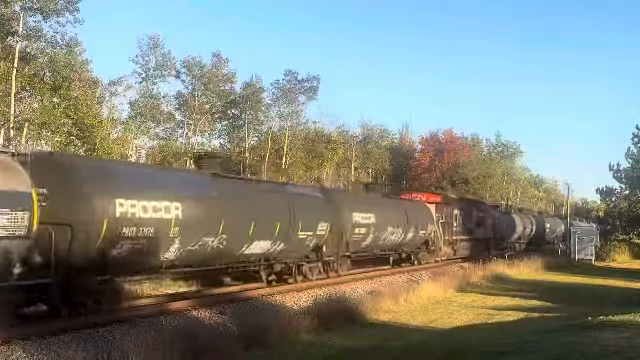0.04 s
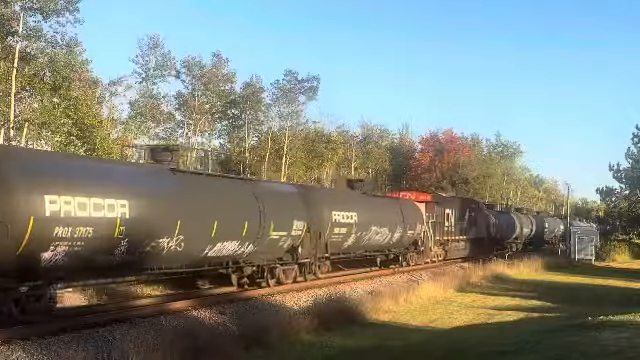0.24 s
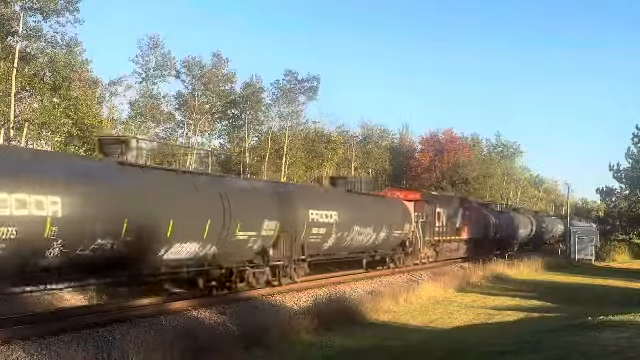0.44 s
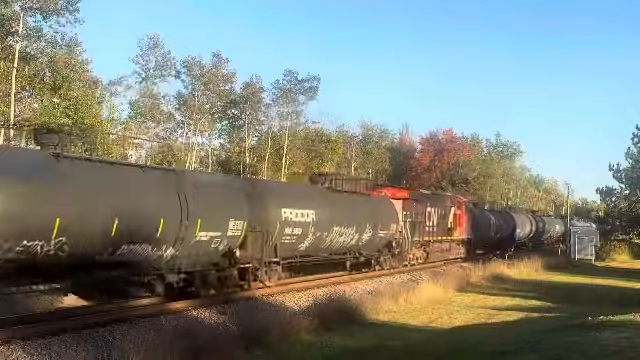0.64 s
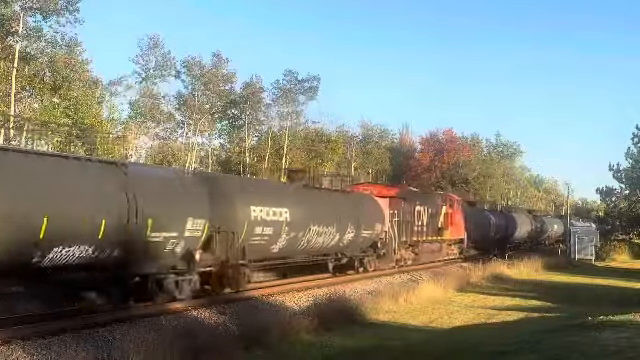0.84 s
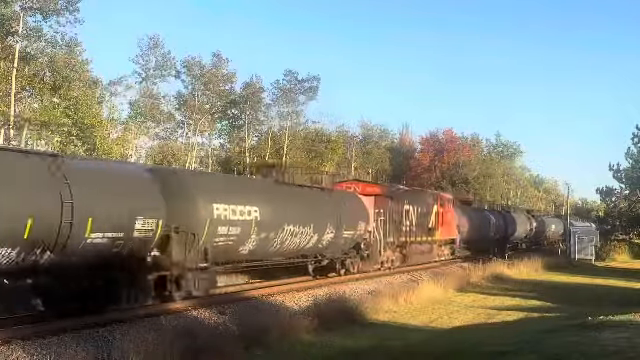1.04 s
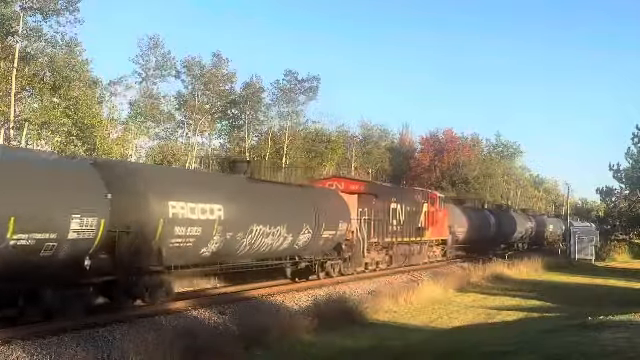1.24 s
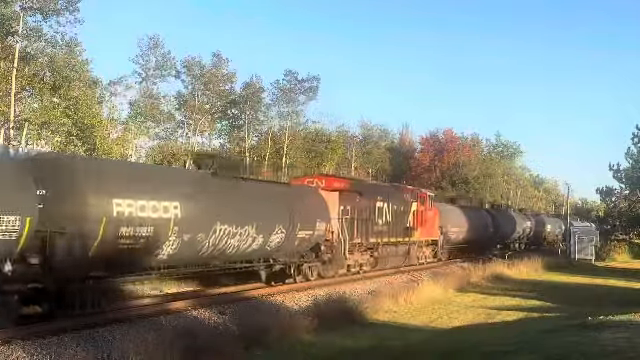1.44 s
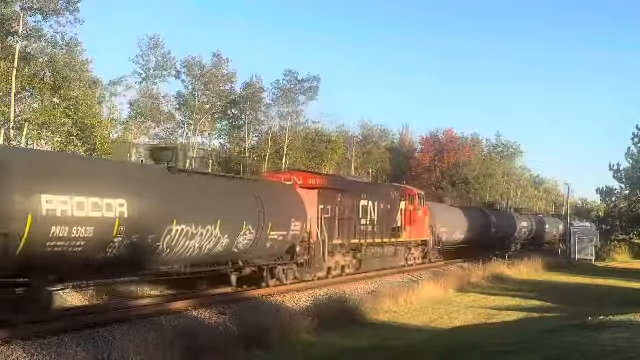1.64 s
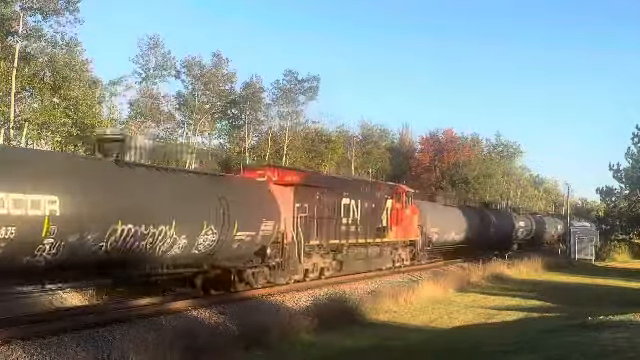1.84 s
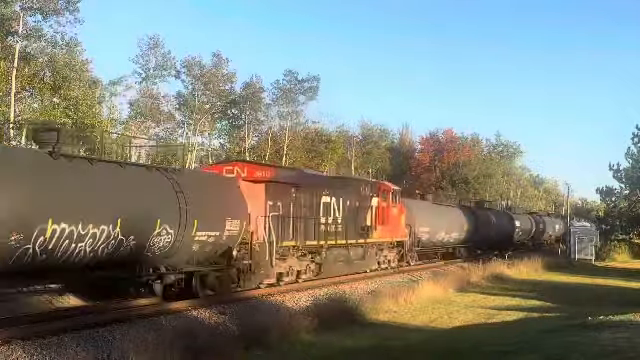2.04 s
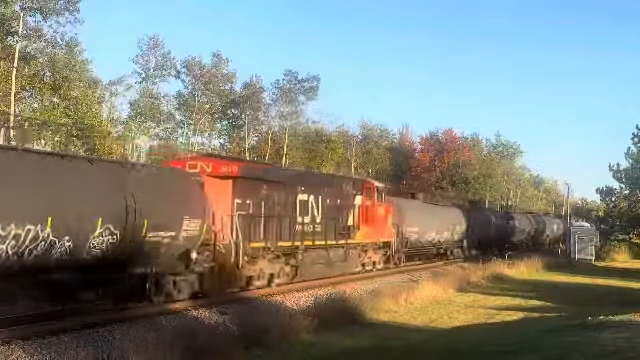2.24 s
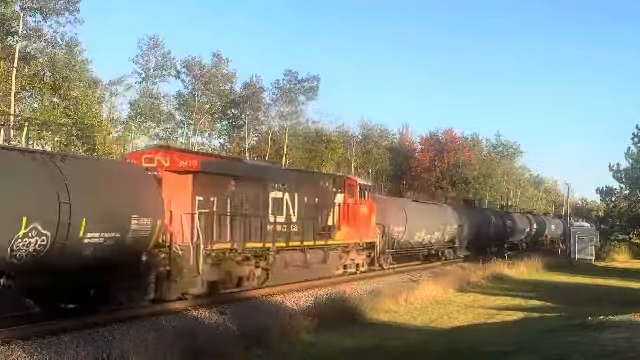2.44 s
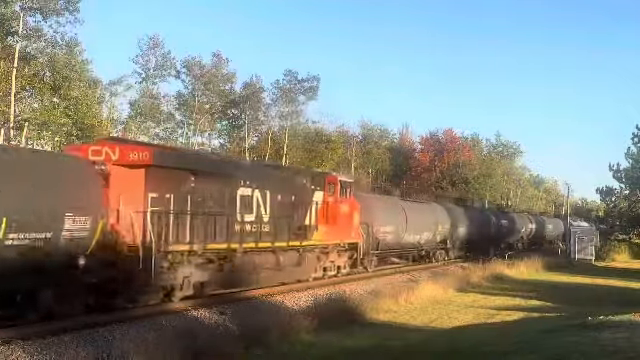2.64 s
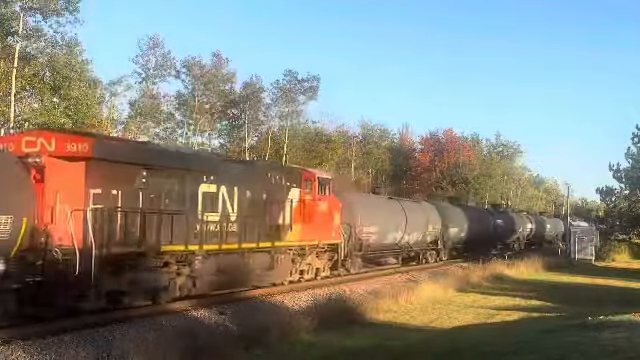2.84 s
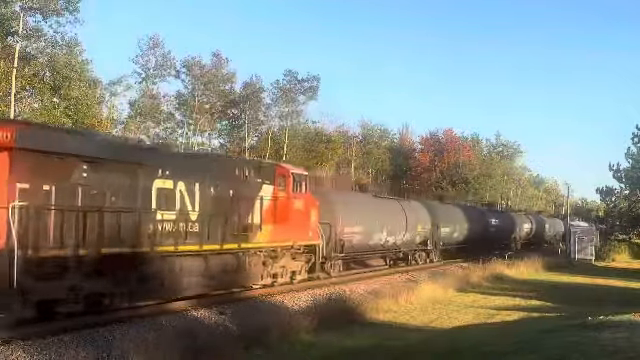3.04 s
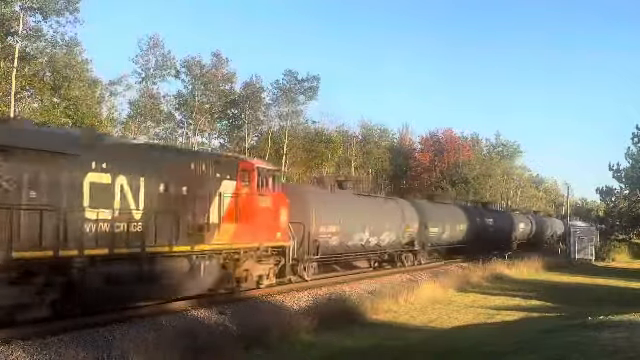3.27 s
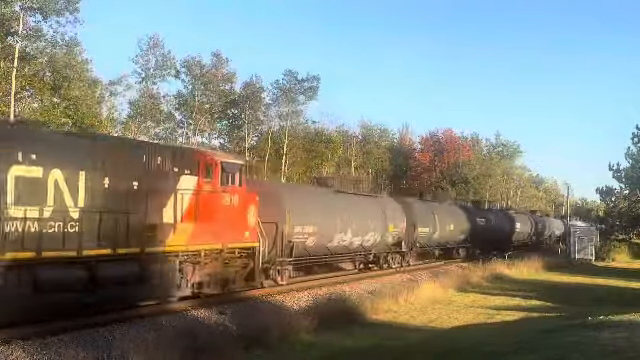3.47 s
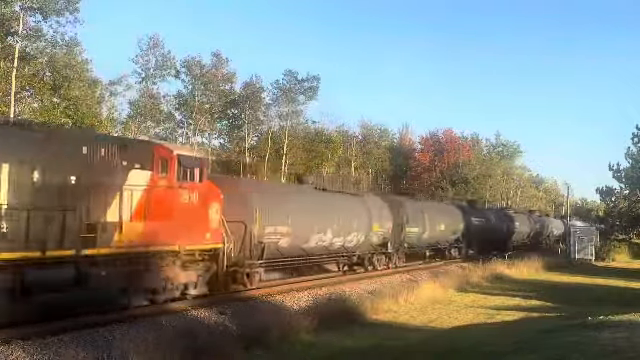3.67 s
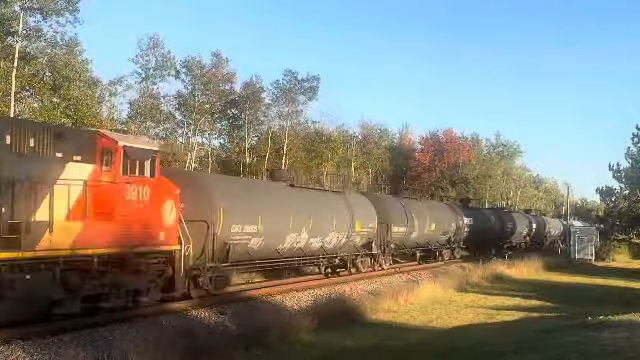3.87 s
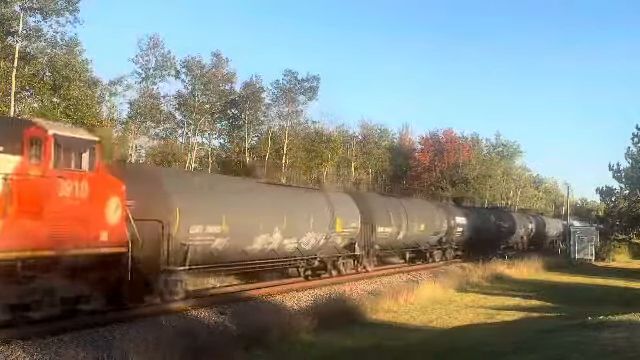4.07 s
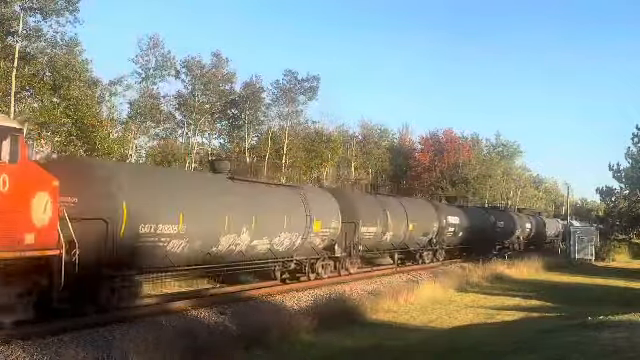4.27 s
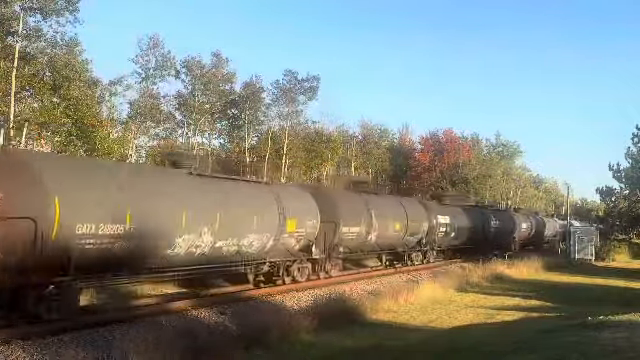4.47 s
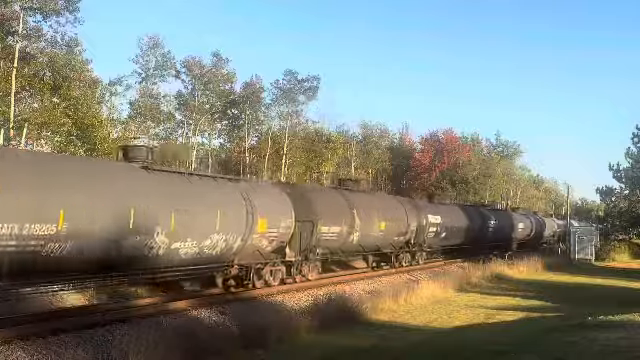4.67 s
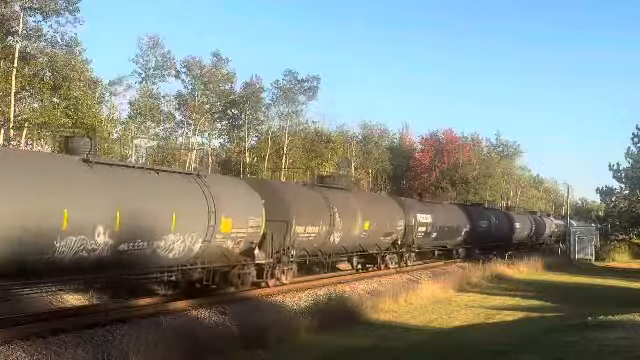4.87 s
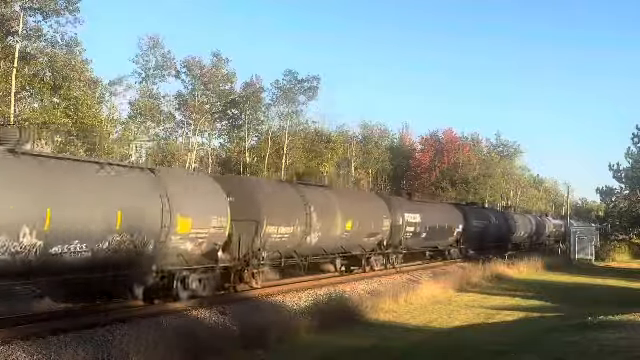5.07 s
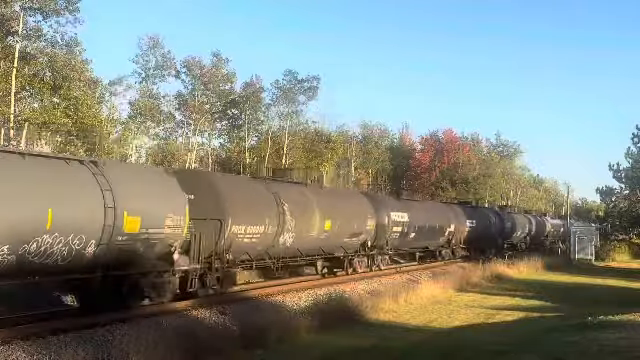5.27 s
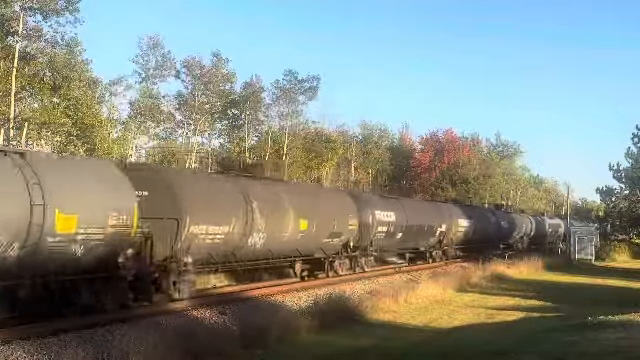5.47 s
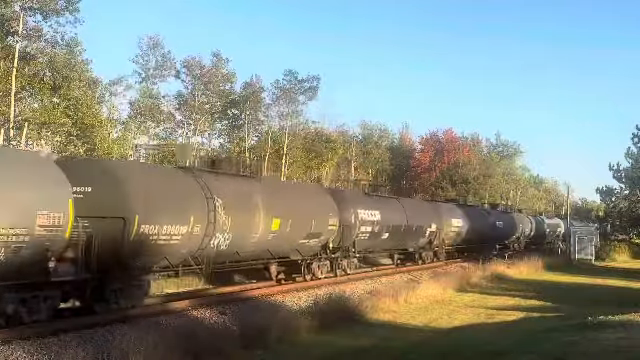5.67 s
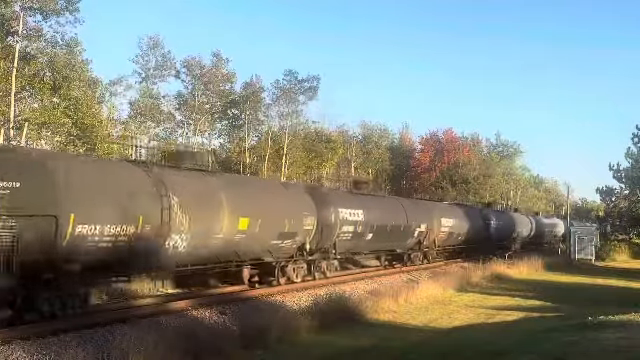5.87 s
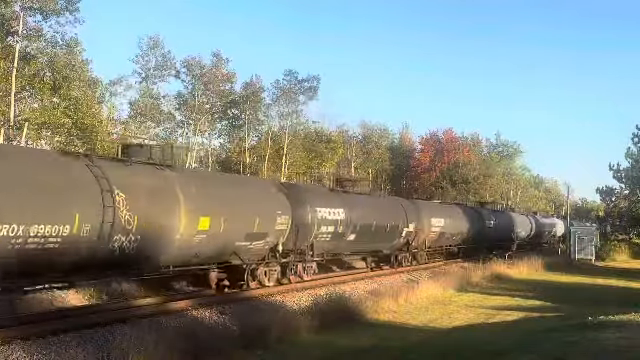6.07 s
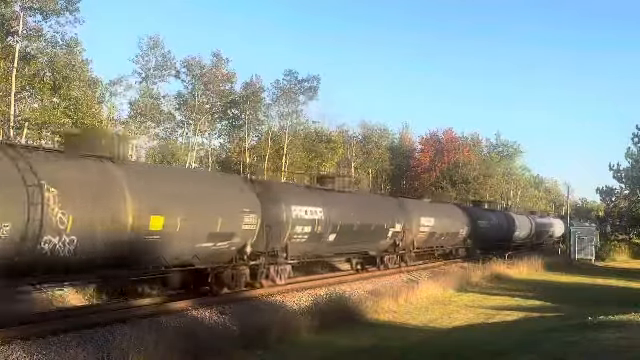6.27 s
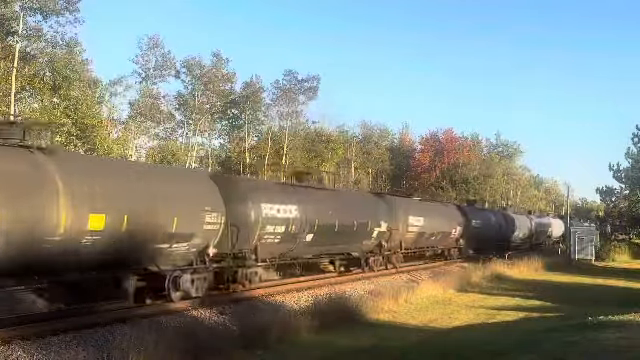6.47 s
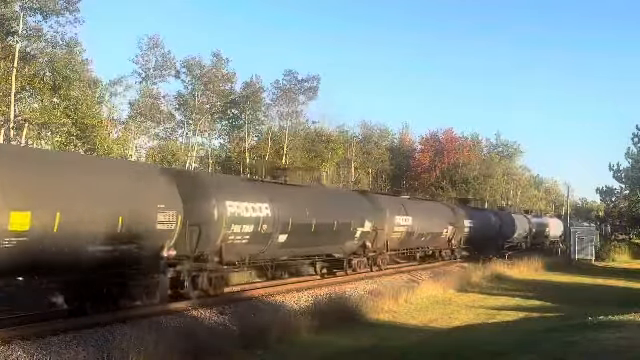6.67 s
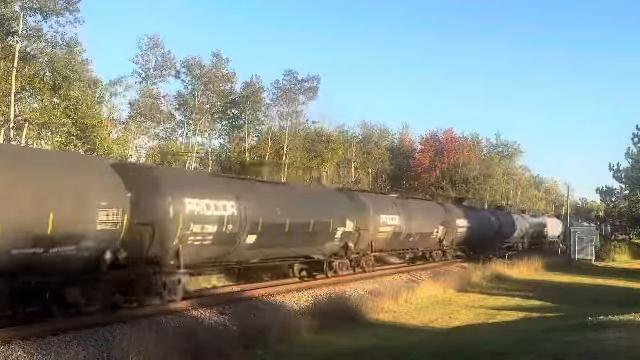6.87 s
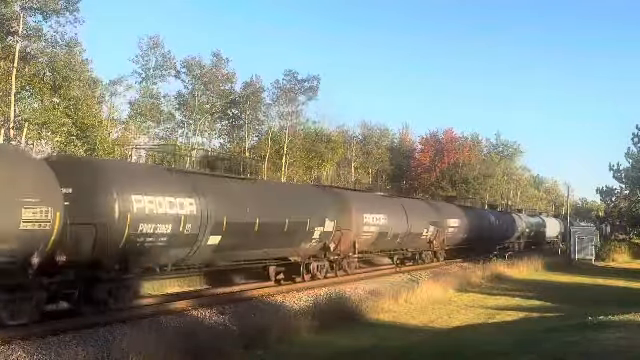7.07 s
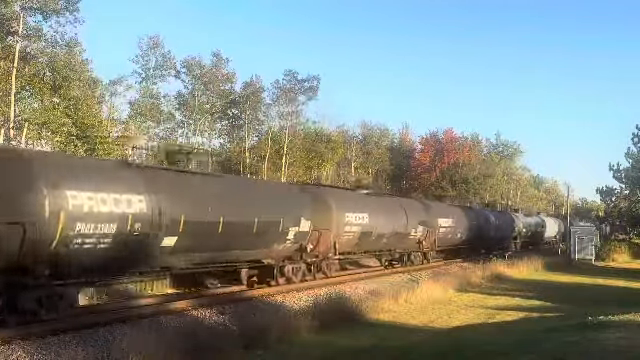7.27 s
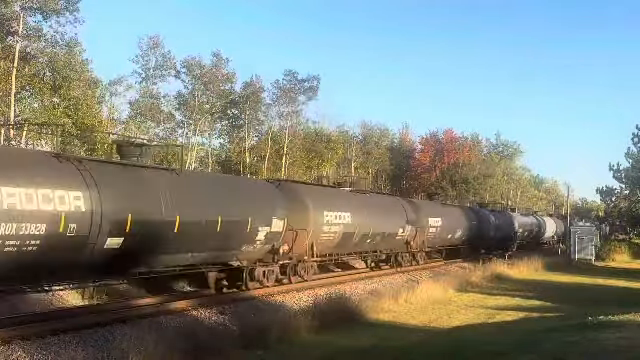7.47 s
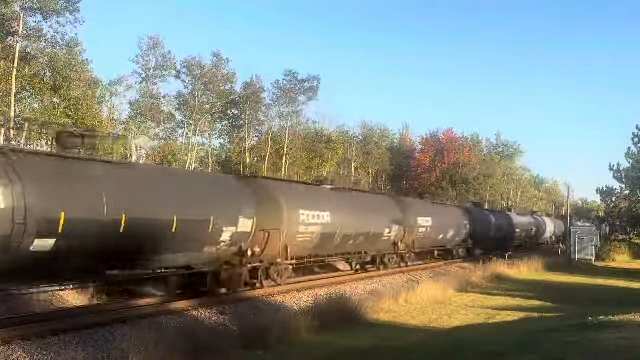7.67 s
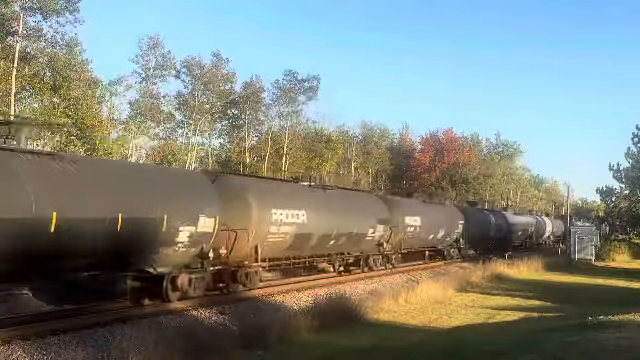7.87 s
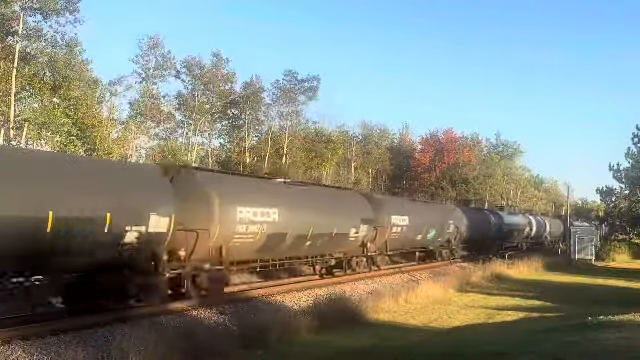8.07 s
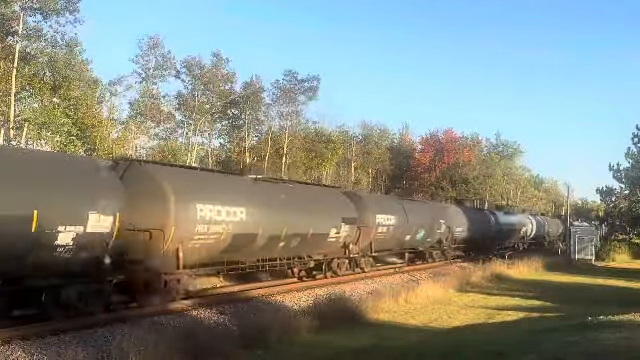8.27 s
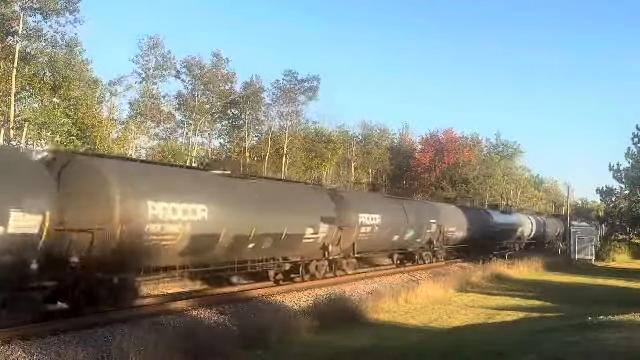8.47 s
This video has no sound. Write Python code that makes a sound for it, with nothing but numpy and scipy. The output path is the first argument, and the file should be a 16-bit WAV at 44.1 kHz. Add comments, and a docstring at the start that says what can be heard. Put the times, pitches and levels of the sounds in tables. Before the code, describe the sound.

Trackside pass of heavy tank cars: regular hard knocks and hissing wheels, a locomotive's throb, whistle and air rush sinking in pitch, then softer rolling.

```python
"""Tank cars of a freight train roll past a trackside listener, a diesel locomotive in mid-train.
Wheel roar and hiss are shaped noise; flat spots and loose bogie parts knock as impulses through a body.
The exhaust throb, turbocharger whistle and gear whine are running-phase tones; all sink in pitch
as the locomotive goes by, and swell in lobes. Its cooling air hisses loudest abreast."""
import sys
import numpy as np
from scipy import signal
from scipy.fft import rfft, irfft, next_fast_len
from scipy.io import wavfile
from scipy.ndimage import uniform_filter1d, map_coordinates

SR = 44100
rng = np.random.default_rng(int(sys.argv[2]) if len(sys.argv) > 2 else 0)


def inscribe(sig):
    """Save sig as 16-bit PCM at rate SR to the path in sys.argv[1].

    A 1-D sig is mono; a 2-D sig holds one channel per row.
    Samples are clipped to [-1, 1] before scaling.
    """
    pcm = np.round(np.clip(np.atleast_2d(sig).T, -1, 1) * 32767)
    wavfile.write(sys.argv[1], SR, pcm.astype(np.int16))


N = 375732
TIME = np.arange(N) / SR
SIDES = np.array([[1], [-1]])  # left, right

# Rolling-noise spectra. Each row: frequency in Hz, relative density in dB per Hz.
RUMBLE_SPECTRUM = [(22, -34), (36, -31), (50, 1.5), (90, 3.5), (150, 0.5), (220, -5.5), (290, -11.5),
                   (600, -56)]
DRUMMING_SPECTRUM = [(150, -25), (250, -0.5), (320, -0.5), (420, -1), (520, -10), (900, -58)]
ROAR_SPECTRUM = [(280, -8.5), (345, -7), (420, -6), (520, -0.5), (700, -2.5), (950, -7), (1300, -13.5),
                 (1700, -16), (2400, -20.5), (5000, -50)]
HISS_SPECTRUM = [(700, -2.5), (1800, -1.5), (2600, 1.1), (3600, 2.5), (5100, 1.5), (5800, 1.5), (7300, 1.5),
                 (8200, -8), (9200, -5), (10200, -14), (11700, -27), (15700, -39.5)]
SIZZLE_SPECTRUM = [(5000, -44), (8200, 2.5), (10500, 0.5), (12000, -9), (15700, -15)]
# Cooling-air spectrum. Each row: frequency in Hz, relative density in dB per Hz.
FANS_SPECTRUM = [(2500, -18), (4800, -1), (6000, -1.5), (7000, 4.5), (8200, 6.5), (9000, 1), (10200, -5.5),
                 (11700, -15.5), (15700, -17)]
# Spectra of bogie thud, rail clank, fittings' ring, rail knock and loose bogie parts.
# Each row: frequency in Hz, relative density in dB per Hz.
THUD_SPECTRUM = [(40, -16), (90, -3), (170, 0.5), (280, -9.5), (600, -18.5), (1500, -65)]
CLANK_SPECTRUM = [(150, -12), (400, -2), (700, 0), (1050, -1.5), (1500, -10.5), (2400, -13.5),
                  (4000, -23.5), (8000, -45)]
RING_SPECTRUM = [(1200, -12), (2800, 0), (5000, -1), (7500, 0), (10000, -12), (15000, -25)]
RAIL_KNOCK_SPECTRUM = [(150, -26), (550, -14), (720, -7), (900, 0), (1030, -1), (1300, -20), (2200, -28),
                       (4000, -42), (9000, -66)]
BOGIE_KNOCK_SPECTRUM = [(100, -22), (240, -4), (360, 0), (700, 0), (1100, -11), (2000, -24), (5000, -45)]

# Likeness of the two channels of a noise. Each row: frequency in Hz, correlation.
CHANNEL_LIKENESS = [(50, 1), (200, 1), (330, 0.93), (500, 0.89), (1100, 0.45), (1500, 0.93), (2000, 1),
                    (2400, 1), (13000, 1), (15000, 0.36)]
# Phase between the channels. Each row: frequency in Hz, phase in half turns.
CHANNEL_PHASE = [(6500, 0), (7300, .46), (7700, .66), (8000, 1), (8700, 1), (9000, .6), (9600, .34),
                 (10300, 0)]
# Side balance, scaled in bearing(). Each row: frequency in Hz, left minus right in dB.
SIDE_BALANCE = [(50, 1.1), (300, 1.3), (500, 2.7), (850, 4), (1200, 3), (1800, 0)]
# Side phase, scaled in bearing(). Each row: frequency in Hz, lead of the left in half turns.
SIDE_LEAD = [(60, .02), (200, .12), (500, .18), (800, .23), (1200, .12), (1500, 0)]
TOP_HZ = 15720
MACH = .042  # train speed over sound speed

# Rolling level of the cars, louder ahead of the locomotive. Each row: time in seconds, level in dB.
CAR_LEVELS = [(0, -.5), (1.1, 1.3), (2.1, 2.5), (4.6, -3.5), (5.7, -7), (7.7, -8), (8.52, -9.5)]
# Car share of each layer, before the layer gains in rolling().
CAR_RUMBLE_DB, CAR_DRUMMING_DB, CAR_ROAR_DB, CAR_HISS_DB = -28, -36, -26.6, -29.5
RUMBLE_FOLLOWS, DRUMMING_FOLLOWS = 0.26, 0.5  # dB per dB of CAR_LEVELS
# The locomotive's two bogies, before the layer gains and spreads in rolling(). Each row: time abreast
# in seconds, seconds to fall 6 dB, drumming in dB, roar in dB, hiss in dB.
LOCO_BOGIES = [(2.85, 0.57, -20, -21, -23.5), (3.9, 0.56, -18.5, -22.5, -25)]
DRUMMING_SPREAD, ROAR_SPREAD = 1.65, 1.52  # fall time, times that of the hiss
# Ground rumble under each end of the locomotive, before the rumble gain.
# Each row: time in seconds, seconds to fall 6 dB, level in dB.
HEAVY_ENDS = [(3, 1.7, -25), (4.5, .9, -27.5)]

# Modes of the rolling wheels. Each row: frequency in Hz, width in Hz (half of it is held to 15-45 Hz),
# relative level in dB.
WHEEL_MODES = [(1957, 46, 5), (2445, 44, 3), (3230, 120, -10), (3900, 33, 1), (4590, 58, -2),
               (5600, 350, -1.5)]
WHEELS_DB = -48.5

# Exhaust lobes sweeping past. Each row: multiple of the base rate, peak level in dB,
# time of the peak in seconds, seconds to fall 3 dB.
EXHAUST_LOBES = [(2, -22, .3, .7), (2, -19.8, 1.65, .45), (2, -22.5, 3.1, .8), (2, -20.8, 5, .7),
                 (2, -29.5, 7, 1.3), (3, -23.5, 3, 1.9), (3, -21, 4.45, .45), (3, -21, 6.4, .55),
                 (3, -25, 7.8, .9), (4, -20, 2.35, .45), (4, -20.3, 4.3, 1.15), (4, -31.5, 4.5, 5),
                 (5, -25.5, 1.05, .2), (5, -29, 1.6, 1.3), (5, -18.5, 3.45, .26), (5, -23.5, 4.65, .22),
                 (5, -21.3, 6.2, .55), (5, -24, 7.4, .4), (5, -24, 8.45, .15), (6, -29, 3, .7),
                 (7, -27.5, 3.9, .55), (7, -29.5, 5, .25), (10.5, -27, 3.96, .35), (10.5, -35, 1.4, .8),
                 (10.5, -34, 4.9, .25), (16, -34, 1.1, 1.6), (16, -29.5, 3.9, .45)]
EXHAUST_HZ = 26.23  # base rate before Doppler

# Turbocharger whistle lobes, before TURBO_GAIN_DB. Each row: time in seconds, seconds to fall 6 dB,
# level in dB.
TURBO_LOBES = [(.27, .1, -35.5), (1.56, .22, -34.5), (2.06, .09, -33.5), (2.25, .06, -37), (2.55, .07, -32),
               (2.74, .08, -29.5), (3.02, .1, -35), (3.3, .15, -32.5), (3.72, .12, -32), (4.25, .2, -35),
               (4.78, .25, -39), (5.35, .2, -44), (5.75, .1, -44.5), (6.4, .2, -53)]
# Whistle smeared into narrow hiss. Each row: time in seconds, seconds to fall 6 dB, level in dB.
TURBO_SMEAR = [(3.15, .3, -39), (4.25, .22, -39), (4.85, .3, -42)]
SMEAR_HZ, TURBO_HZ = 70, 3969  # hiss width; whistle before Doppler
# Steady whistle between lobes, its change once past, and the gain on whistle and lobes.
TURBO_DB, TURBO_BEHIND_DB, TURBO_GAIN_DB = -47, -27, 1

# Wheel flats. Each row: knock time in seconds, knock in dB, seconds until the wheel lands,
# thud in dB, clank in dB (both before the gains in wheel_flats()), top of the clank in Hz.
FLATS = [(.084, -5.5, .014, -9, -16.5, 4500), (.269, -10.5, .009, -6.5, -14.5, 5500),
         (.451, -9, .006, -9, -14.5, 6000), (.641, -13, .004, -7, -15.5, 7000),
         (.828, -12, .004, -7.5, -16.5, 3000), (1.013, -17, .003, -9, -20, 3000),
         (1.198, -17, .003, -11, -19, 4000), (1.383, -15, .005, -9, -19, 3000),
         (1.574, -20, .004, -14, -24, 2000), (1.766, -21, .003, -8, -25, 2000),
         (1.955, -21, .004, -10, -24, 2000), (2.175, -18, .003, -7, -23, 2000),
         (5.919, -24, .006, -22, -27, 1300), (6.115, -22, .008, -20, -26, 1800),
         (6.306, -25, .006, -24, -29, 1300), (6.508, -23, .006, -19, -27, 1300),
         (6.93, -26, .005, -20, -32, 1500), (7.138, -24, .004, -25, -31, 1500),
         (7.327, -25, .004, -19, -27.5, 1600), (7.881, -19, .002, -15, -22.5, 4200),
         (8.069, -17, .002, -12, -25, 2300), (8.257, -17, .003, -12, -27, 1600),
         (8.447, -23, .003, -9, -26.5, 800)]
# Clinks of loose steel fittings. Each row: time in seconds, level in dB.
CLINKS = [(.098, -29), (.28, -30.5), (.457, -27), (.639, -24), (1.2, -33), (7.885, -42)]
SHUDDER_DB = -8  # against the tabled thud
CLANK_T60_S, CLANK_TAIL_DB, CLANK_TAIL_T60_S = .085, -16, .3
RATTLE_DB, RATTLE_PER_S = 2.5, 260  # depth, knots a second

# Hard knocks with the bogie-knock body; some give weight to or follow wheel-flat blows (0.477, 6.52, 7.33,
# 7.884 s). # Each row: time in seconds, level in dB.
HARD_KNOCKS = [(.477, -6), (1.29, -10), (2.323, -7), (6.13, -15), (6.245, -17), (6.52, -16), (6.79, -18),
               (6.96, -18), (7.33, -20), (7.37, -19), (7.71, -20), (7.884, -13)]
BOGIE_KNOCK_DB = -15  # on top of CAR_LEVELS

# Geared axles. Each row: tooth rate in Hz before Doppler, time of closest approach in seconds.
AXLES = [(389.5, 4.55), (397.3, 5.45), (394, 4.6)]
# Gear-whine lobes, before WHINE_GAIN_DB. Each row: axle index, multiple of the tooth rate,
# time in seconds, seconds to fall 6 dB, level in dB.
WHINE_LOBES = [(0, 2, 2.38, .2, -30), (0, 2, 3.05, .35, -29), (0, 2, 3.68, .18, -25.5),
               (0, 3, 1.6, .8, -40), (0, 3, 2.87, .09, -28), (0, 3, 3.22, .14, -30.5),
               (0, 3, 3.85, .28, -33.5), (0, 5, 2.9, .8, -40), (1, 2, 4.58, .12, -29),
               (1, 2, 4.92, .13, -30), (1, 2, 5.45, .35, -38.5), (1, 3, 3.3, .9, -38.5),
               (1, 3, 4.28, .08, -34), (1, 3, 5.1, .4, -37.8), (1, 3, 6.22, .15, -42),
               (1, 3, 6.85, .25, -46), (2, 2, 5.12, .2, -35), (2, 3, 5.1, .2, -42), (2, 3, 5.88, .13, -42)]
# Whine between lobes, gain on whine and lobes, unsteadiness of the tooth rate.
WHINE_DB, WHINE_GAIN_DB, WHINE_WANDER_HZ = -55.5, 1, 1.975

# Singing bands of the rolling noise. Each row: time in seconds, frequency in Hz, width in Hz,
# level in dB, seconds to fall 6 dB, glide at that time in Hz per second.
SINGING_BANDS = [(3.5, 204.5, 70, -26.3, .9, 0), (4.05, 288, 109, -23.8, .75, 0),
                 (3.93, 6090, 650, -26.3, .32, 0), (3.6, 7320, 500, -39, 1.15, -400),
                 (4.42, 7130, 600, -33.5, .43, -800), (5, 6590, 600, -36.5, .43, -650),
                 (5.2, 10150, 600, -50, .35, 0), (5.2, 14450, 1000, -54, .35, 0),
                 (6.6, 9800, 500, -57, .5, 600), (7.1, 500, 170, -36, 3, 0), (7.3, 2003, 50, -55, .7, 0),
                 (6.8, 1205, 18, -52, .5, 0), (8.1, 3270, 90, -56, .4, 0), (5.1, 2400, 40, -46, .12, 0)]


def amp(db):
    """Decibels to gain."""
    return 10 ** (np.asarray(db) / 20)


def unit(x):
    """Scale to rms 1."""
    return x / np.sqrt(np.mean(x ** 2) + 1e-20)


def along(points, hz):
    """Read (Hz, value) points on a log frequency axis."""
    f, v = np.transpose(points)
    return np.interp(np.log(hz + 1), np.log(f + 1), v)


def wobble(rate):
    """Smooth random curve, rate knots a second."""
    coarse = TIME[::32]
    knots = rng.standard_normal(int(N * rate / SR) + 4)
    return np.interp(TIME, coarse, map_coordinates(knots, [coarse * rate]))


def cycles(hz):
    """Running phase in radians of a changing frequency."""
    return 2 * np.pi * np.cumsum(hz) / SR


def filtered(x, response):
    """x through a response given as a function of Hz."""
    m = next_fast_len(N + 8192)
    return irfft(rfft(x, m) * response(np.fft.rfftfreq(m, 1 / SR)), m)[..., :N]


def rush(spectrum, patchy_db):
    """Stereo noise of rms 1, in which narrow resonances come and go."""
    z = signal.stft(rng.standard_normal((2, N)), nperseg=1024)[2]
    field = uniform_filter1d(rng.standard_normal(z.shape[1:]), size=3, axis=0)  # across frequency
    field = uniform_filter1d(field, size=30, axis=1)  # across time
    pair = signal.istft(z * amp(patchy_db * unit(field)), nperseg=1024)[1][:, :N]

    def mid_side(hz):
        turn = np.arccos(np.clip(along(CHANNEL_LIKENESS, hz), -1, 1)) / 2
        return amp(along(spectrum, hz)) * [np.cos(turn), np.sin(turn)]

    mid, side = filtered(pair, mid_side)
    return unit(np.array([mid + side, mid - side]))


def narrow(phase, width_hz):
    """Narrow noise of rms 1 around a running phase."""
    a, b = filtered(rng.standard_normal((2, N)), lambda hz: np.exp(-(1.1 * hz / width_hz) ** 2))
    return unit(a * np.cos(phase) + b * np.sin(phase))


def flutter(phase, depth):
    """Tone of rms 1; paths off the ground and the cars beat against the direct one."""
    scatter = lambda rate: wobble(rate) + 1j * wobble(rate)
    paths = 1 + depth * (scatter(70) + .45 * scatter(230))
    return unit(np.real(paths * np.exp(1j * phase)))


def nearness(closest, reach):
    """1 / distance of a passing source, 1 at its closest; it covers that distance in reach seconds."""
    return 1 / np.hypot(1, (TIME - closest) / reach)


def train_db(steady_db, passes):
    """Power sum in dB of a steady level and passing sources (s, reach s, dB)."""
    passing = sum((amp(db) * nearness(s, reach) ** 2) ** 2 for s, reach, db in passes)
    return 10 * np.log10(amp(steady_db) ** 2 + passing)


def doppler(closest, reach):
    """Pitch factor of a passing source: sharp on approach, flat once past."""
    return 1 / (1 + MACH * (TIME - closest) / reach * nearness(closest, reach))


def passed():
    """0 while the locomotive approaches, 1 once it has gone by."""
    return np.interp(TIME, [4.1, 5.1], [0, 1])


def decay(attack, t60, tail_db, tail_t60):
    """Half-second envelope: quick rise, fast decay plus a slower tail; times in seconds."""
    t = np.arange(SR // 2) / SR
    return (1 - np.exp(-t / attack)) * (amp(-60 * t / t60) + amp(tail_db - 60 * t / tail_t60))


def blows(times, levels_db, attack, t60, tail_db, tail_t60):
    """Envelope of many blows, summed in power; each peaks at its level."""
    shape = decay(attack, t60, tail_db, tail_t60)
    power = np.bincount(np.clip(times * SR, 0, N - 1).astype(int), amp(levels_db) ** 2, N)
    return np.sqrt(np.abs(signal.fftconvolve(power, (shape / shape.max()) ** 2)[:N]))


def struck(times, levels_db, spectrum):
    """Impulses through a causal minimum-phase body; each peaks at its level."""
    size = 8192
    cepstrum = irfft(np.log(amp(along(spectrum, np.fft.rfftfreq(size, 1 / SR)))))
    body = irfft(np.exp(rfft(2 * cepstrum[:size // 2], size)))[:size // 2]
    hits = np.bincount((times * SR).astype(int), amp(levels_db), N)
    return signal.fftconvolve(hits, body / np.abs(body).max())[:N]


def rolling():
    """Rough treads shake car bodies, wheels and rail; random knocks modulate the lower layers."""
    cars_db = np.interp(TIME, *np.transpose(CAR_LEVELS))
    abreast, reach, drummings, roars, hisses = np.transpose(LOCO_BOGIES)
    rumble_db = train_db(CAR_RUMBLE_DB + RUMBLE_FOLLOWS * cars_db, HEAVY_ENDS)
    drumming_passes = zip(abreast, DRUMMING_SPREAD * reach, drummings)
    drumming_db = train_db(CAR_DRUMMING_DB + DRUMMING_FOLLOWS * cars_db, drumming_passes)
    # the first bogie's roar peaks 0.15 s early
    roar_db = train_db(CAR_ROAR_DB + cars_db, zip(abreast - [.15, 0], ROAR_SPREAD * reach, roars))
    hiss_db = train_db(CAR_HISS_DB + cars_db, zip(abreast, reach, hisses)) + 1.08 * wobble(25)
    # the air swallows the highest treble, so it fades faster with distance
    sizzle_db = 1.83 * hiss_db + 7.0

    when, force = rng.random((130, 2)).T
    knocks = unit(blows(when * N / SR, 12 * force, attack=0.0022, t60=0.035, tail_db=2.0, tail_t60=0.67))
    rumble = amp(rumble_db + 5.5) * rush(RUMBLE_SPECTRUM, patchy_db=1.0) * unit(1 + 0.26 * knocks)
    drumming = amp(drumming_db - 2.5) * rush(DRUMMING_SPECTRUM, patchy_db=2.0) * unit(1 + 0.34 * knocks)
    roar = amp(roar_db + .5) * rush(ROAR_SPECTRUM, patchy_db=1.93) * unit(1 + 0.067 * knocks)
    hiss = amp(hiss_db - 1.3) * rush(HISS_SPECTRUM, patchy_db=1.6)
    sizzle = amp(sizzle_db) * rush(SIZZLE_SPECTRUM, patchy_db=1.5)
    return rumble + drumming + roar + hiss + sizzle


def wheels():
    """Rubbing noise excites the wheels' own modes, which sing faintly and come and go."""
    def modes(f):
        return sum(amp(db) / (1 + ((f - hz) / np.clip(width / 2, 15, 45)) ** 2)
                   for hz, width, db in WHEEL_MODES)

    rubbing = rush(HISS_SPECTRUM, patchy_db=2.2)
    return amp(WHEELS_DB) * unit(filtered(rubbing, modes))


def diesel():
    """Exhaust throb: orders of a base rate swell and fade in turn as the stack moves by."""
    crank = cycles(EXHAUST_HZ * doppler(4.79, 1.01)) + .02 * wobble(14)
    power = {}
    for k, db, loudest, reach in EXHAUST_LOBES:
        power[k] = power.get(k, 0) + amp(db) ** 2 * .5 ** (((TIME - loudest) / reach) ** 2)

    def order(k):
        # the muffler delays each order differently, which spreads the puff
        return np.sqrt(2) * np.cos(k * crank + .33 * k * k)

    return sum(np.sqrt(p) * amp(0.5 * wobble(12.0)) * order(k) for k, p in power.items())


def turbo():
    """Turbocharger: a thin, fluttering whistle, thrown mostly forward, plus a narrow hiss about its pitch."""
    level_db = train_db(TURBO_DB + TURBO_BEHIND_DB * passed(), TURBO_LOBES)
    shaft = cycles(TURBO_HZ * doppler(4.83, .95))
    whistle = amp(level_db + TURBO_GAIN_DB + 1.2 * wobble(16)) * flutter(shaft, depth=.45)
    smear_db = train_db(TURBO_DB + TURBO_BEHIND_DB, TURBO_SMEAR)
    return whistle + amp(smear_db) * narrow(shaft, SMEAR_HZ)


def clanks(times, levels_db, tops_hz):
    """The rail clanks under each blow and rattles on; each burst is low-passed at its own top."""
    shape = decay(.001, CLANK_T60_S, CLANK_TAIL_DB, CLANK_TAIL_T60_S)
    steel = rush(CLANK_SPECTRUM, patchy_db=2.5) * unit(amp(RATTLE_DB * wobble(RATTLE_PER_S)))
    out = np.zeros((2, N))
    for s, db, hz in zip(times, levels_db, tops_hz):
        span = slice(int(s * SR), int(s * SR) + len(shape))
        fade = shape[:N - span.start]
        burst = unit(steel[:, span] * fade) * np.sqrt(np.mean(fade ** 2)) * amp(db)
        out[:, span] += signal.sosfilt(signal.butter(2, hz, fs=SR, output="sos"), burst)
    return out


def wheel_flats():
    """A flat spot knocks on the rail; the wheel lands, the bogie thuds, rail clanks and fittings clink."""
    s, knock_db, drop_s, thud_db, clank_db, top_hz = np.transpose(FLATS)
    lands = s + drop_s
    knock = struck(s, knock_db, RAIL_KNOCK_SPECTRUM)
    # push, then an equal pull 2.5 ms later
    thud = struck(lands, thud_db - 2, THUD_SPECTRUM) - struck(lands + .0025, thud_db - 2, THUD_SPECTRUM)
    shakes = blows(lands, thud_db + SHUDDER_DB, attack=0.0047, t60=0.12, tail_db=-23.5, tail_t60=.29)
    shudder = shakes * rush(THUD_SPECTRUM, patchy_db=0.5)
    # the rail already clanks under the first knock
    first = [s, knock_db - 15, top_hz]
    landing = [lands, clank_db + .5, top_hz]
    clank = clanks(*np.hstack([first, landing]))
    clink_s, clink_db = np.transpose(CLINKS)
    clinks = blows(clink_s, clink_db, attack=.001, t60=.13, tail_db=-18.5, tail_t60=.31)
    ring = clinks * rush(RING_SPECTRUM, patchy_db=2.5)
    return knock + thud + shudder + clank + ring


def bogie_knocks():
    """Springs and brake gear knock at random times, plus a few set hard knocks."""
    s = rng.uniform(0, TIME[-1], 110)
    scatter_db = rng.uniform(-7.8, 3, len(s))
    level_db = BOGIE_KNOCK_DB + np.interp(s, *np.transpose(CAR_LEVELS)) + scatter_db
    loose = struck(s, level_db, BOGIE_KNOCK_SPECTRUM)
    return loose + struck(*np.transpose(HARD_KNOCKS), BOGIE_KNOCK_SPECTRUM)


def gears():
    """Traction gears of each axle whine at multiples of the tooth rate, a little unsteadily."""
    mesh = [cycles(tooth_hz * doppler(closest, .8) + WHINE_WANDER_HZ * wobble(14))
            for tooth_hz, closest in AXLES]
    lobes = {}
    for axle, k, *lobe in WHINE_LOBES:
        lobes.setdefault((axle, k), []).append(lobe)
    return sum(amp(train_db(WHINE_DB, rows) + WHINE_GAIN_DB) * flutter(k * mesh[axle], depth=.36)
               for (axle, k), rows in lobes.items())


def singing():
    """Narrow bands stand out of the rolling noise as wheels pass; some glide as the angle changes."""
    return sum(amp(db) * nearness(s, reach) ** 2 * narrow(cycles(hz + glide * np.tanh(TIME - s)), width)
               for s, hz, width, db, reach, glide in SINGING_BANDS)


def cooling_air():
    """Air hisses through the locomotive's grilles, loudest abreast."""
    return amp(-24.0) * nearness(3.97, 0.77) ** 2 * rush(FANS_SPECTRUM, patchy_db=1)


def bearing(x):
    """Once the locomotive is past, the sides even out in level and drift further apart in phase."""
    def heard(tilt, skew):
        def response(hz):
            level = amp(SIDES * tilt * along(SIDE_BALANCE, hz) / 2)
            return level * np.exp(.5j * np.pi * SIDES * skew * along(SIDE_LEAD, hz))
        return filtered(x, response)

    return (1 - passed()) * heard(0.99, 0.92) + passed() * heard(0.12, 2.42)


def scene():
    """The whole train, heard from the trackside."""
    train = rolling() + wheels() + wheel_flats() + bogie_knocks() + singing()
    locomotive = diesel() + turbo() + gears() + cooling_air()
    return bearing(train + locomotive)


def record(dry):
    """Put a narrow treble band out of step between channels, round off peaks and cut the top."""
    heard = filtered(dry, lambda hz: np.exp(.5j * np.pi * SIDES * along(CHANNEL_PHASE, hz)))
    rounded = heard / (1 + np.abs(heard / .97) ** 6) ** (1 / 6)
    return filtered(rounded, lambda hz: hz < TOP_HZ)


dry = scene()
out = record(dry)
inscribe(out)
```